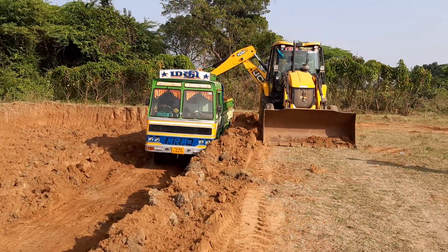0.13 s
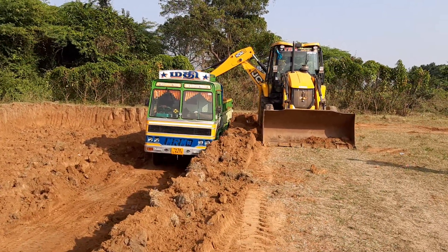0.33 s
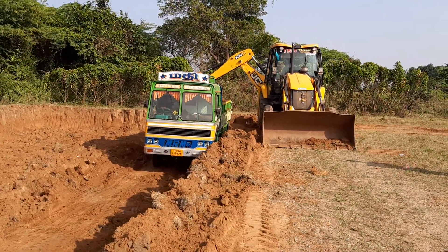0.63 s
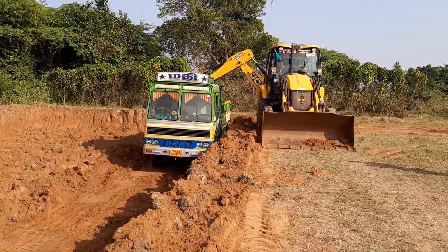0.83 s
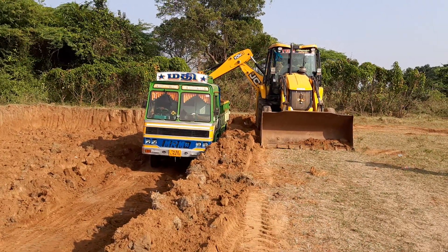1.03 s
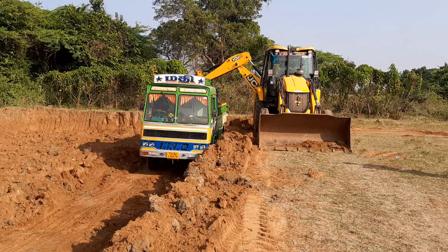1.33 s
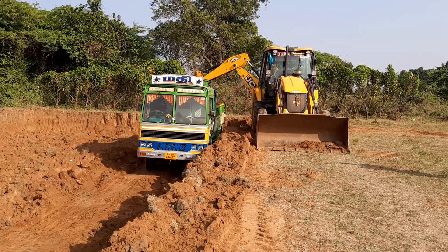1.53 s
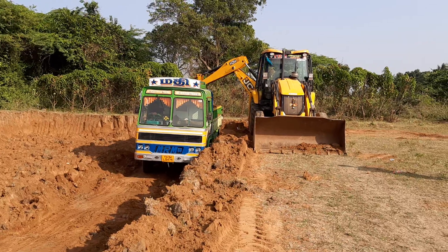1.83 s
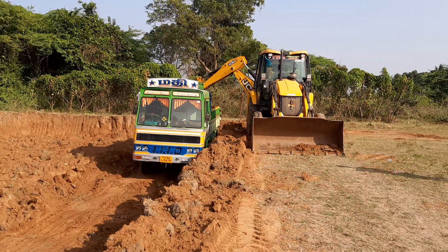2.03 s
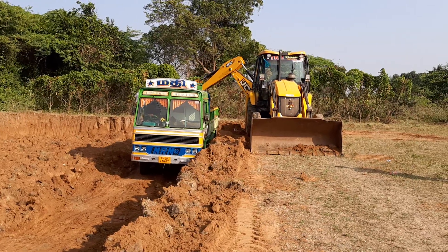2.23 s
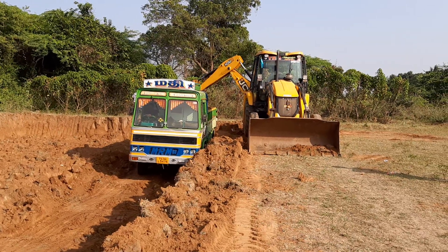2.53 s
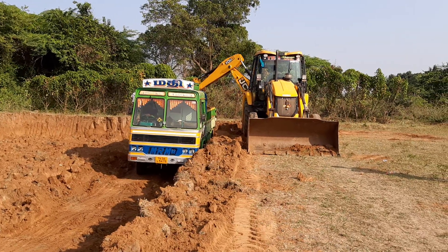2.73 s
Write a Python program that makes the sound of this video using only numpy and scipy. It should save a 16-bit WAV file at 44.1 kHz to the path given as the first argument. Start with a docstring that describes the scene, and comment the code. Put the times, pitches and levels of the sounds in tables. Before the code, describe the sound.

Steady throaty diesel chugging of a backhoe loader, with loud metallic bucket bangs midway through

```python
"""A four-cylinder diesel digger works some metres away in an open earth pit, under a light wind.
From the start the exhaust booms as harmonic sines, each firing rings pipe and silencer, knocks and hisses,
and coloured noise and a narrow noise band give the rush and whine of fan, intake and hydraulics.
At 0.4 s the bucket clanks once; from 1.3 to 2.4 s it is shaken over a lorry: noise cracks, steel modes, echoes.
Low noise buffets the microphones throughout, with the strongest gusts between 1.3 and 1.9 s."""
import sys
import numpy as np
from scipy import signal
from scipy.fft import rfft, irfft
from scipy.io import wavfile

SR = 44100
rng = np.random.default_rng(int(sys.argv[2]) if len(sys.argv) > 2 else 0)


def file_out(sig):
    """Save sig as 16-bit WAV at sys.argv[1]."""
    # one column per channel
    cols = np.atleast_2d(sig).T
    # limit, then scale
    lim = np.clip(cols, -1, 1)
    pcm = np.round(lim * 32767).astype(np.int16)
    wavfile.write(sys.argv[1], SR, pcm)


N = 127890
T = np.arange(N) / SR

# Firing rate of the engine: start_s, rate_hz
FIRING_RATE = [(0.0, 43.87), (0.09, 45.66), (0.18, 45.9), (0.26, 45.67), (0.35, 46.44), (0.44, 43.74),
               (0.53, 43.11), (0.62, 44.67), (0.7, 47.91), (0.79, 47.73), (0.88, 45.8), (0.97, 44.73),
               (1.05, 45.53), (1.14, 46.03), (1.23, 44.85), (1.32, 44.33), (1.41, 46.13), (1.49, 45.72),
               (1.58, 44.46), (1.67, 44.51), (1.76, 45.91), (1.85, 47.76), (1.93, 47.13), (2.02, 47.56),
               (2.11, 47.06), (2.2, 47.62), (2.28, 45.01), (2.37, 44.25), (2.46, 44.78), (2.55, 46.18),
               (2.64, 45.72), (2.72, 45.2), (2.81, 44.23), (2.9, 43.59)]
# Exhaust harmonics of the firing rate: start_s, first_db, second_db, third_db (rms)
EXHAUST_ORDERS = [(0.0, -39, -27, -23), (0.04, -34, -31, -29.5), (0.08, -36, -28, -28.5),
                  (0.2, -39, -28, -28.5), (0.29, -35, -29, -33.5), (0.41, -38, -29, -27),
                  (0.47, -40, -32.5, -33), (0.6, -37, -27, -22.5), (0.68, -32, -22, -23.5),
                  (0.73, -31, -24.5, -29), (0.92, -38, -37, -31), (0.95, -41, -34, -52),
                  (0.99, -36, -31, -31.5), (1.15, -37, -28.5, -31.5), (1.26, -41, -31, -31.5),
                  (1.47, -36, -25.5, -25.5), (1.55, -38, -29.5, -30.5), (1.71, -38, -30.5, -28),
                  (1.78, -36, -25.5, -26.5), (1.87, -35, -27.5, -31.5), (2.13, -40, -36, -29),
                  (2.25, -45, -32, -34.5), (2.29, -42, -43, -34), (2.32, -39, -37, -40),
                  (2.39, -39, -30.5, -26.5), (2.6, -33.5, -27, -31), (2.7, -40, -28.5, -27.5),
                  (2.75, -38, -30.5, -32), (2.87, -44, -34, -29.5), (2.9, -40, -29, -27)]
# Phase of the three harmonics at a firing: phase_turns
ORDER_PHASE = [0, .31, -.14]
# Orders between the harmonics, from unequal cylinders: multiple_of_firing_rate, level_db (re second harmonic)
UNEVEN_ORDERS = [(1.5, -22), (2.5, -12), (2.75, -23), (3.25, -17), (3.5, -14), (3.75, -21), (4.25, -20),
                 (4.75, -17), (5.25, -22)]
# Exhaust pipe resonances: pitch_hz, level_db (relative), t60_s
PIPE_MODES = [(534.3, 2, 0.089), (492, -3, 0.024), (540, -15.5, 0.32), (714, -14, 0.05), (995, -16, 0.048),
              (1230, -15.5, 0.06)]
# Pipe ring, ahead of its quench and high-pass: start_s, level_db
PIPE_LEVEL = [(0.0, -33), (0.18, -36), (0.25, -25.5), (0.28, -38.5), (0.38, -29.5), (0.45, -40),
              (0.47, -29), (0.59, -22), (0.61, -31), (0.65, -20), (0.73, -33), (0.75, -25.5), (0.78, -33),
              (0.89, -40), (0.91, -29), (0.98, -39), (1.05, -27), (1.07, -33.5), (1.23, -34), (1.24, -48),
              (1.32, -23), (1.34, -27), (1.61, -37.5), (1.67, -25.5), (1.7, -35), (1.76, -22.5),
              (1.85, -45), (1.87, -32.5), (2.04, -31.5), (2.07, -36), (2.46, -38), (2.48, -29.5),
              (2.76, -32.5), (2.85, -23), (2.88, -49), (2.9, -36)]
# Silencer resonances: pitch_hz, level_db (relative), t60_s
SILENCER_MODES = [(164, 8.5, 0.02), (214, 6, 0.0097), (286, 0.5, 0.0057)]
# Silencer thump, ahead of its band filter: start_s, level_db
THUMP_LEVEL = [(0.0, -48), (0.04, -35), (0.91, -35.5), (0.94, -45), (1.01, -31.5), (1.31, -46), (1.35, -32),
               (1.4, -31), (1.58, -40.5), (2.1, -40.5), (2.11, -35.5), (2.48, -48), (2.62, -41.5),
               (2.9, -31.5)]
# Blows of the bucket: start_s, level_db (before a common trim), ring_db (before a common boost),
# brightness_db_per_octave, crack_t60_s, favoured_hz, favour_db, snap_height (re crack; below 0 means none)
CLANKS = [(0.3934,-15,-6.5,-1,0.18,3900,6.5,1), (1.306,-27,-11,-12,0.077,725,2,5),
          (1.334,-29,4.5,-20,0.15,2040,10,-6), (1.338,-23,3,-11,0.16,725,12,3.5),
          (1.3639,-13,-10,-3.5,0.12,3170,12,0), (1.367,-17.5,-7,-16,0.12,1040,12.5,5),
          (1.3751,-18,-9,-7.5,0.13,2040,5,-0.5), (1.386,-28,-10,-8,.1,3480,4,-4),
          (1.4935,-10.5,-9,3.5,0.11,4150,2,1), (1.497,-13.5,-1.5,-2,0.17,1480,0.5,-0.5),
          (1.509,-31,-9,-2,0.11,3270,5,0), (1.5484,-23.5,4.5,-5.5,0.054,3370,21,11.5),
          (1.5742,-12.5,-3.5,-1,0.1,3400,12,3.5), (1.5925,-19.5,-5,-2,0.17,3305,2,3.5),
          (1.6317,-21.5,-11,-3.5,0.22,3330,-1,1), (1.6701,-18.5,-3,-3.5,0.08,3800,8,1.2),
          (1.685,-17,4,-3,0.15,1450,17,.5), (1.678,-27,-8,-5,0.1,3900,5,4),
          (1.689,-23.5,-11,-3.5,0.084,3700,22,3), (1.701,-36,0,-2,.12,3420,14,-5),
          (1.712,-28,3,0,0.11,3700,9,-4), (1.722,-31.5,11.5,-30,0.092,2020,22,-6),
          (1.738,-24,-8,-6,0.16,3305,7,-2), (1.8571,-19,-11,-9.5,0.29,4150,7,-0.5),
          (2.0122,-23,6,1.5,0.13,3930,10,2), (2.015,-23,5.5,-10,0.14,1470,9.5,-3),
          (2.022,-32,-4,4,.15,3530,8,-3), (2.034,-23,-2,-3,0.14,4280,9,1.5),
          (2.0505,-23,-5.5,2.5,0.1,3420,8,0), (2.054,-22,1,-8,.07,1480,10,4),
          (2.279,-31,-4,-7,0.13,3440,9,-3), (2.308,-32,-2.5,-10,0.076,3305,0,9),
          (2.436,-23.5,-2.5,-5.5,0.2,2040,5,-4)]
# Modes of the steel bucket: pitch_hz, level_db (relative), t60_s
BUCKET_MODES = [(725, -2, .1), (1040, -5, .08), (1490, -2, .07), (2040, -5, .1), (2300, -10, .08),
                (2880, -9, .08), (3305, -3, .11), (3420, -7, .07), (3720, -5, .11), (4300, -5, .06),
                (4450, -7, .08), (5150, -9, .06), (5480, -10, .05), (6020, -10, .07)]
# Noise spectrum of a crack: pitch_hz, density_db_per_hz (relative)
CRACK_SPECTRUM = [(400, -10), (750, 3), (1100, -8), (1500, 0.5), (2500, -1.5), (3500, 1.5), (5500, -6),
                  (7500, -13), (8600, -26.5), (10500, -22.5), (15000, -37)]
# Echoes from pit walls and lorry side: delay_s, level_db
ECHOES = [(0.019, -19), (0.034, -13.5), (0.061, -21.5), (0.09, -27)]
# Noise spectrum of the rush: pitch_hz, density_db_per_hz (relative)
RUSH_SPECTRUM = [(30,-28), (48,-15), (86,-12), (141,-8), (183,-11.5), (238,-13.5), (309,-22.5), (391,-20.5),
                 (460,-15.5), (535,-8), (643,-19), (714,-16.5), (835,-23.5), (1110,-17.5), (1370,-27),
                 (1530,-20.5), (1650,-26.5), (1980,-28), (2140,-32), (2600, -33.5), (3300, -32),
                 (4470,-30.5), (6110,-38), (7950,-46.5), (8600,-56), (9300, -50.5), (12100,-53),
                 (15700,-47)]
# Level of the rush between 1 and 6 kHz, before flicker: start_s, level_db
RUSH_LEVEL = [(0.0, -40.5), (0.39, -40.5), (0.56, -36), (0.73, -40.5), (1.15, -41), (1.4, -40),
              (1.57, -38.5), (1.99, -40.5), (2.9, -40.5)]
# Gusts on the microphones, before flutter: centre_s, level_db, half_length_s
GUSTS = [(0.3, -74, 0.089), (0.7, -58, 0.1), (1.302, -41, 0.042), (1.558, -28.5, 0.027), (1.67, -47, 0.051),
         (1.8, -34, .025), (1.89, -42, 0.045), (2.103, -60, 0.062), (2.6, -67, .1)]
# Left-right likeness of engine and rush: pitch_hz, correlation
ENGINE_LIKENESS = [(60, 0.94), (200, 1), (380, 0.97), (540, 1), (750, 0.97), (1000, 0.95), (1300, 0.87),
                   (2400, 0.26), (4400, 0.5), (6500, 0.3), (9000, 0.35), (12000, -0.28), (15000, 0.1)]
# Left-right likeness of the clanks: pitch_hz, correlation
CLANK_LIKENESS = [(700, 1), (1400, 0.78), (4400, 0.48), (8000, 0.16), (15000, 0.01)]
# Balance of the microphone pair: pitch_hz, left_minus_right_db
LEFT_MINUS_RIGHT = [(60, -0.9), (380, -.5), (700, 0), (1290, 2.5), (2380, -2), (4400, -3), (6000, 1.5),
                    (8120, 0), (11000, 3), (15000, -3)]

FIRST_FIRING = -.065  # crank position at the start (firings)
UNEVEN_WAVER_DB = 1.5
PULSE_SPREAD_DB, PULSE_JITTER_S = 1.0, 0.0002  # chance in strength and timing
PUFF_S, PUFF_SHARE = 0.0024, 0.3
# Lags are in firings after top; strengths are in dB for each cylinder
PIPE_LAG, PIPE_CYLINDER_DB = .18, [-8.0, 0, -7.0, 0]
PIPE_QUENCH, QUENCH_FIRINGS = .7, .25  # share removed, half width in firings
THUMP_LAG, THUMP_CYLINDER_DB = .25, [0, -1.5, -5.0, -4.5]
KNOCK_LAG, KNOCK_DB, KNOCK_T60_S, KNOCK_LOW_HZ, KNOCK_HIGH_HZ = .18, -52, 0.06, 900, 2600
HISS_LAG, HISS_DB, HISS_T60_S, HISS_LOW_HZ, HISS_HIGH_HZ = -.15, -63, 0.09, 9500, 17300
CLANK_TRIM_DB, CLANK_ATTACK_S, SNAP_S = -13.5, .0004, .0015
CRACK_FAVOUR_DB, FAVOUR_OCTAVES = 3, 0.13
BUCKET_SPREAD_DB, RING_TILT_SHARE = 1.5, 0.31  # chance per mode; the ring brightens with the crack
RATTLE_HZ = 137  # loose steel makes each ring flutter, at 0.6 to 1.6 times this rate
ECHO_CUT_HZ = 3600
PATCHY_DB, TOGETHER_SHARE = 1.55, 0.72  # flicker of each rush band, and its part common to all bands
STEADY_FROM_BAND = 16  # half-octave bands from about 7.7 kHz do not follow the load
WHINE_HZ, WHINE_WIDTH_HZ, WHINE_DB = 1531, 32, -48
WIND_DB, WIND_LOW_HZ, WIND_CUT_HZ, WIND_FLUTTER_DB = -55.5, 42, 117, 3
LEFT_LAG_S = 58e-6  # the engine stands to the right
LOW_CUT_HZ, CUTOFF_HZ = 30, 15850


def engine():
    """Superposition: exhaust harmonics and the responses to each firing add, as mid and side."""
    turns = FIRST_FIRING + np.cumsum(in_time(FIRING_RATE)[0]) / SR  # one turn per firing
    boom = exhaust_boom(turns) * [[1], [.3]]
    return boom + pipe_ring(turns) + silencer_thump(turns) + block_knock(turns) + valve_hiss(turns)


def exhaust_boom(turns):
    """Fourier series: periodic firing gives harmonics, and unequal cylinders add orders between them."""
    order_db = in_time(EXHAUST_ORDERS)
    boom = np.zeros(N)
    for k, db in enumerate(order_db):
        boom += np.sqrt(2) * amp(db) * np.cos(2 * np.pi * ((k + 1) * turns + ORDER_PHASE[k]))
    for multiple, db in UNEVEN_ORDERS:
        level = amp(order_db[1] + db + UNEVEN_WAVER_DB * drift(1.8))
        boom += np.sqrt(2) * level * np.sin(2 * np.pi * (multiple * turns + rng.random()))
    return boom


def pipe_ring(turns):
    """Resonance with varying damping: the ring is quenched as the valve opens for a strong firing."""
    ringing = struck(firings(turns, PIPE_LAG, PIPE_CYLINDER_DB), PIPE_MODES)
    from_strong = (turns - PIPE_LAG + .12) % 2 - 1  # every second firing is strong
    ringing = ringing * (1 - PIPE_QUENCH * np.exp(-(from_strong / QUENCH_FIRINGS) ** 2))
    high = signal.butter(2, 400, "high", fs=SR, output="sos")
    return amp(in_time(PIPE_LEVEL)[0]) * signal.sosfilt(high, ringing)


def silencer_thump(turns):
    """Impulse response of a heavily damped cavity: each firing thumps the silencer."""
    thump = struck(firings(turns, THUMP_LAG, THUMP_CYLINDER_DB), SILENCER_MODES)
    band = signal.butter(2, [150, 300], "band", fs=SR, output="sos")
    return amp(in_time(THUMP_LEVEL)[0]) * signal.sosfilt(band, thump)


def block_knock(turns):
    """Impact excitation: each firing starts a decaying burst of band noise in the block."""
    pulses = firings(turns, KNOCK_LAG, PIPE_CYLINDER_DB)
    return amp(KNOCK_DB) * gated(pulses, KNOCK_T60_S, KNOCK_LOW_HZ, KNOCK_HIGH_HZ)


def valve_hiss(turns):
    """Jet noise: each firing starts a decaying burst of treble at the valves."""
    pulses = firings(turns, HISS_LAG, [0, 0, 0, 0])
    return amp(HISS_DB) * gated(pulses, HISS_T60_S, HISS_LOW_HZ, HISS_HIGH_HZ)


def firings(turns, lag, cylinder_db):
    """Impulse train: one click per firing, its strength set by cylinder plus chance."""
    fired = np.flatnonzero(np.diff(np.floor(turns - lag)))
    luck = rng.standard_normal((len(fired), 2))
    cylinder = np.floor(turns[fired + 1] - lag).astype(int) % 4
    place = np.clip(fired + (PULSE_JITTER_S * SR * luck[:, 0]).astype(int), 0, N - 1)
    pulses = np.zeros(N)
    pulses[place] = amp(np.array(cylinder_db)[cylinder] + PULSE_SPREAD_DB * luck[:, 1])
    return pulses


def struck(pulses, modes):
    """Modal excitation: clicks and turbulent puffs ring the resonances, as unlike mid and side of rms 1."""
    envelope = signal.lfilter([1], [1, -np.exp(-1 / (PUFF_S * SR))], pulses)
    puff = rms_one(envelope * rng.standard_normal((2, N)))
    clicks = 9.0 * rms_one(pulses) / np.sqrt(PUFF_S * SR)
    drive = np.array([clicks + PUFF_SHARE * puff[0], puff[1]])
    rung = sum(amp(db) * ring(drive, hz, t60) for hz, db, t60 in modes)
    return np.array([rms_one(row) for row in rung])


def gated(pulses, t60, low_hz, high_hz):
    """Amplitude modulation: noise flares and decays at each pulse, then passes a band filter; rms 1."""
    gate = signal.lfilter([1], [1, -amp(-60 / (t60 * SR))], pulses)
    band = signal.butter(2, [low_hz, high_hz], "band", fs=SR, output="sos")
    return rms_one(signal.sosfilt(band, gate * rng.standard_normal((2, N))))


def clanks():
    """Impact and reflection: blows crack and ring the bucket, and dull echoes follow, as mid and side."""
    size = SR // 4
    t = np.arange(size) / SR
    out = np.zeros((2, N + SR))
    for s, db, ring_db, tilt_db, t60, favoured, favour_db, snap in CLANKS:
        crack = clank_crack(t, tilt_db, t60, favoured, snap)
        modes = bucket_ring(t, ring_db, tilt_db, favoured, favour_db)
        blow = (crack + 2 * modes * [[1], [.5]]) * np.minimum(t / CLANK_ATTACK_S, 1)
        start = int(s * SR)
        out[:, start:start + size] += amp(db + CLANK_TRIM_DB) * blow
    dull = signal.sosfilt(signal.butter(1, ECHO_CUT_HZ, fs=SR, output="sos"), out[0])
    for k, (delay, db) in enumerate(ECHOES):
        out[k % 2] += amp(db) * np.roll(dull, int(delay * SR))  # mid and side in turn
    return out[:, :N]


def clank_crack(t, tilt_db, t60, favoured, snap):
    """Broadband contact noise: it decays exponentially, and may open with a shorter snap."""
    hz = np.geomspace(300, 16000, 50)
    near = np.exp(-(np.log2(hz / favoured) / FAVOUR_OCTAVES) ** 2)
    level = at_hz(CRACK_SPECTRUM, hz) + tilt_db * np.log2(hz / 3500) + CRACK_FAVOUR_DB * near
    noise = rms_one(colour(rng.standard_normal((2, len(t))), np.column_stack([hz, level])))
    return noise * amp(-60 * t / t60) * (1 + max(snap, 0) * np.exp(-t / SNAP_S))


def bucket_ring(t, ring_db, tilt_db, favoured, favour_db):
    """Modal sum: damped sines whose strength falls away from the favoured mode, each fluttering."""
    total = np.zeros(len(t))
    for hz, mode_db, life in BUCKET_MODES:
        chance, phase = rng.standard_normal(2)
        octaves = np.log2(hz / favoured)
        level = mode_db + ring_db + BUCKET_SPREAD_DB * chance + RING_TILT_SHARE * tilt_db * octaves
        level += favour_db * (np.exp(-(octaves / FAVOUR_OCTAVES) ** 2) - 1)
        flutter = 1 + .6 * np.sin(2 * np.pi * (RATTLE_HZ * (.6 + chance % 1) * t + phase))
        total += amp(level - 60 * t / life) * flutter * np.sin(2 * np.pi * (hz * t + phase))
    return total


def rush():
    """Broadband flow noise: fan, intake and hydraulics as half-octave bands that flicker a little."""
    noise = colour(rng.standard_normal((2, N)), RUSH_SPECTRUM)
    hz = np.fft.rfftfreq(N, 1 / SR)
    middle = irfft(rfft(noise[0]) * ((hz > 1000) & (hz < 6000)), N)
    spectrum = rfft(noise / np.sqrt(np.mean(middle ** 2)))
    band = 2 * np.log2(np.maximum(hz, 1) / 30)  # half octaves above 30 Hz
    together = drift(20.0)
    load_db = in_time(RUSH_LEVEL)[0]
    total = np.zeros((2, N))
    for k in range(20):
        flicker_db = PATCHY_DB * (drift(12.0) + TOGETHER_SHARE * together)
        level_db = load_db if k < STEADY_FROM_BAND else load_db.mean()
        part = irfft(spectrum * np.clip(1 - abs(band - k), 0, 1), N)
        total += part * amp(flicker_db + level_db)
    return total


def whine():
    """Narrow-band filtering: noise twice through one resonance is the hydraulic pump's whine."""
    edges = [WHINE_HZ - WHINE_WIDTH_HZ / 2, WHINE_HZ + WHINE_WIDTH_HZ / 2]
    band = signal.butter(1, edges, "band", fs=SR, output="sos")
    tone = rms_one(signal.sosfilt(np.r_[band, band], rng.standard_normal(N)))
    return amp(WHINE_DB) * tone * [[.2], [-1]]  # mostly right, in opposite polarity


def wind():
    """Turbulent pressure: low noise, independent in each channel, flutters and swells in gusts."""
    level = amp(WIND_DB) + sum(amp(db) * np.exp(-((T - s) / half) ** 2) for s, db, half in GUSTS)
    band = signal.butter(3, [WIND_LOW_HZ, WIND_CUT_HZ], "band", fs=SR, output="sos")
    low = signal.sosfilt(band, rng.standard_normal((2, N)))
    flutter = amp([WIND_FLUTTER_DB * drift(26.0), WIND_FLUTTER_DB * drift(31.0)])
    return level * rms_one(low) * flutter


def stereo(mid, side, likeness, lag_s=0):
    """Interchannel coherence: likeness and balance of the microphone pair depend on pitch."""
    hz = np.maximum(np.fft.rfftfreq(N, 1 / SR), 1)
    alike = np.clip(at_hz(likeness, hz), -1, 1)
    lean = at_hz(LEFT_MINUS_RIGHT, hz) / 2
    m = rfft(mid)
    s = rfft(side) * np.sqrt((1 - alike) / (1.01 + alike))
    left = (m + s) * amp(lean) * np.exp(-2j * np.pi * hz * lag_s)
    right = (m - s) * amp(-lean)
    return irfft(np.array([left, right]), N)


def amp(db):
    """Logarithmic level: dB to gain."""
    return 10 ** (np.asarray(db) / 20)


def rms_one(x):
    """Normalisation: scale to rms 1."""
    return x / np.sqrt(np.mean(x ** 2) + 1e-20)


def in_time(rows):
    """Linear interpolation: columns of a curve table at every sample."""
    s, *columns = np.transpose(rows)
    return [np.interp(T, s, c) for c in columns]


def at_hz(points, hz):
    """Logarithmic pitch: read a spectrum table on a log-frequency axis."""
    table_hz, values = np.array(points).T
    return np.interp(np.log(hz), np.log(table_hz), values)


def drift(rate):
    """Low-passed chance: a slow random curve of spread 1, cornering near the rate in Hz."""
    r = np.exp(-80 * np.pi * rate / SR)  # computed at every 40th sample
    noise = rng.standard_normal(N // 40 + 2002)
    slow = signal.lfilter([1], [1, -2 * r, r * r], noise)[2000:]  # settled part
    return np.interp(np.arange(N) / 40, np.arange(len(slow)), rms_one(slow - slow.mean()))


def ring(clicks, hz, t60):
    """Damped oscillator: a unit click sets a sine of height 1 ringing."""
    r, w = amp(-60 / (t60 * SR)), 2 * np.pi * hz / SR
    return signal.lfilter([0, np.sin(w)], [1, -2 * r * np.cos(w), r * r], clicks + 1e-18)


def colour(x, spectrum):
    """Spectral filtering: shape noise by a table of levels."""
    hz = np.maximum(np.fft.rfftfreq(x.shape[-1], 1 / SR), 1)
    return irfft(rfft(x) * amp(at_hz(spectrum, hz)), x.shape[-1])


def scene():
    """Superposition: all sources add at the microphone pair."""
    machine = stereo(*(engine() + rush()), ENGINE_LIKENESS, LEFT_LAG_S)
    bucket = stereo(*clanks(), CLANK_LIKENESS)
    return machine + bucket + whine() + wind()


def record(dry):
    """Band limiting: the microphone drops the deep bass, and the top is cut steeply."""
    dry = signal.sosfilt(signal.cheby2(16, 60, CUTOFF_HZ + 100, fs=SR, output="sos"), dry)
    hz = np.fft.rfftfreq(N, 1 / SR)
    return irfft(rfft(dry) / np.sqrt(1 + (LOW_CUT_HZ / (hz + 1)) ** 8), N)


dry = scene()
out = record(dry)
file_out(out)
```